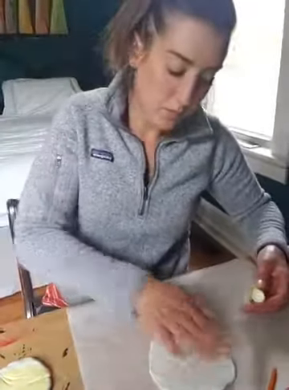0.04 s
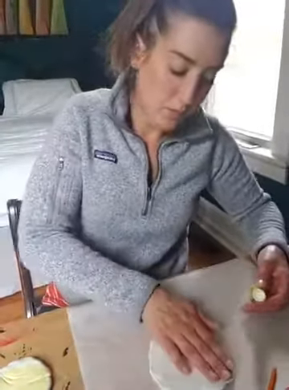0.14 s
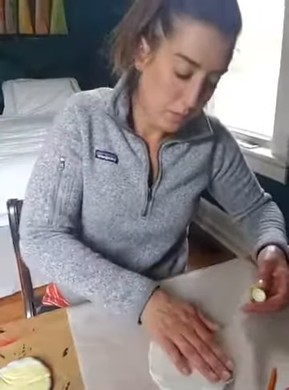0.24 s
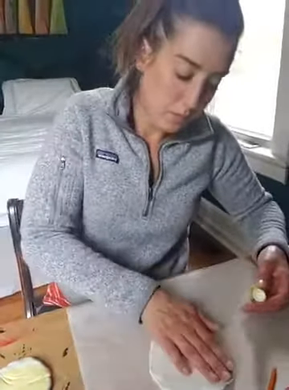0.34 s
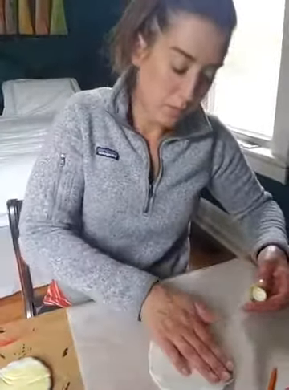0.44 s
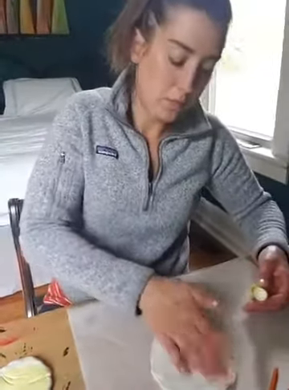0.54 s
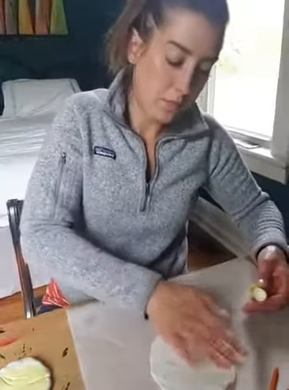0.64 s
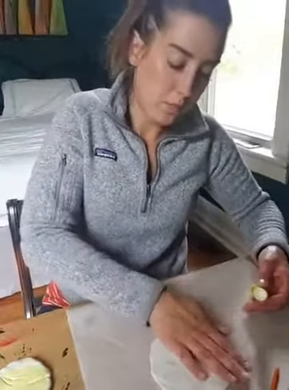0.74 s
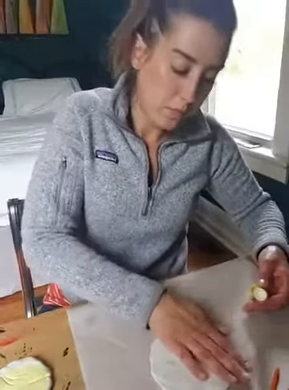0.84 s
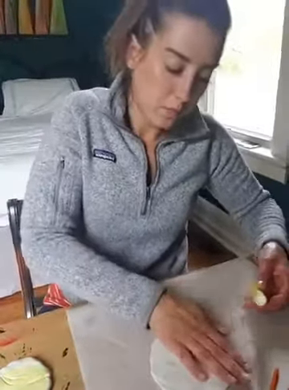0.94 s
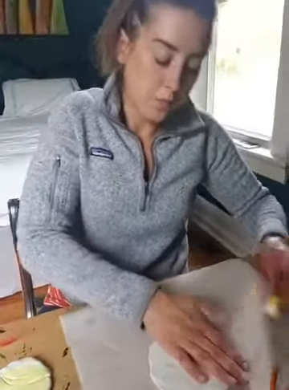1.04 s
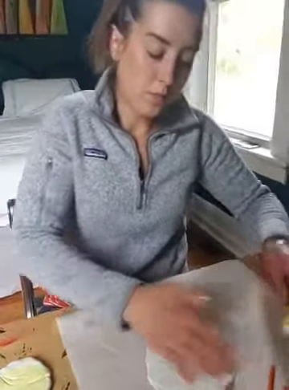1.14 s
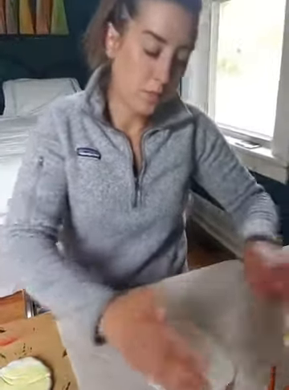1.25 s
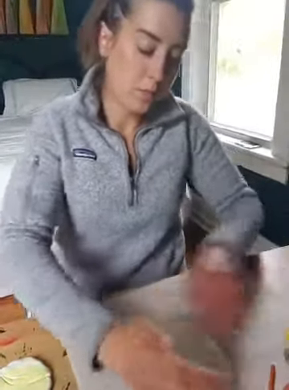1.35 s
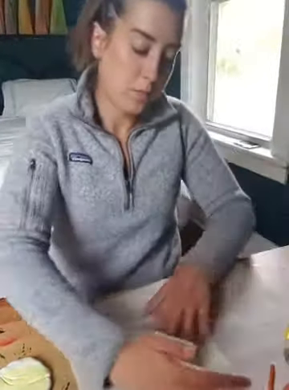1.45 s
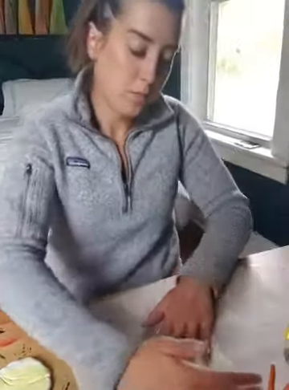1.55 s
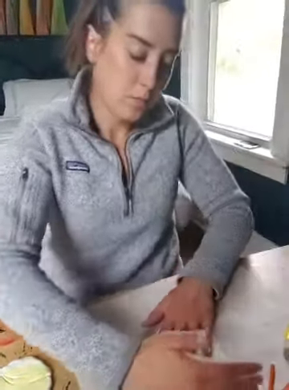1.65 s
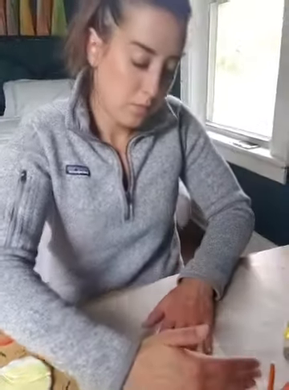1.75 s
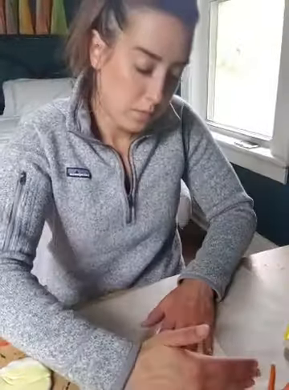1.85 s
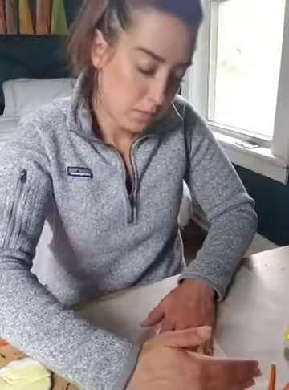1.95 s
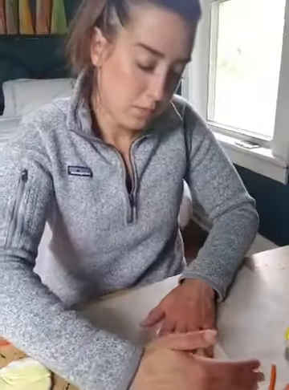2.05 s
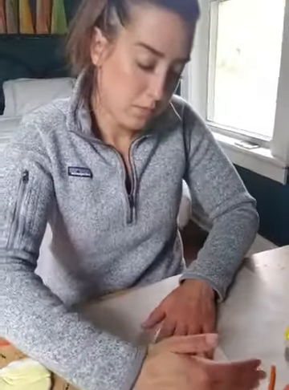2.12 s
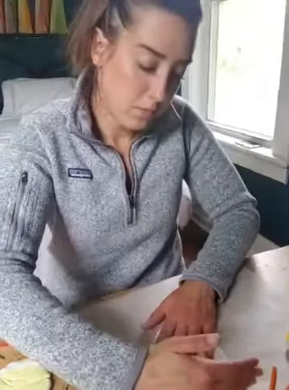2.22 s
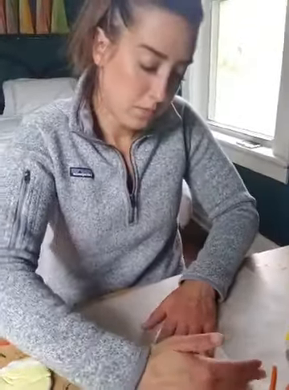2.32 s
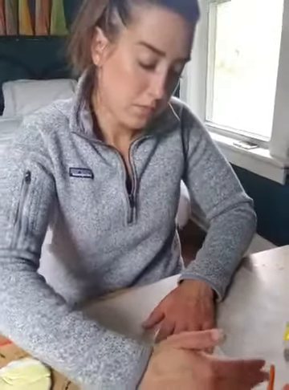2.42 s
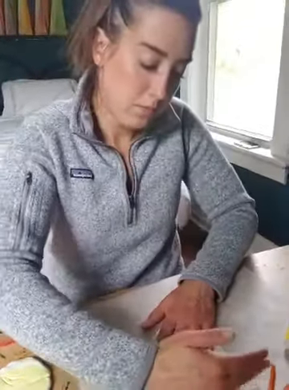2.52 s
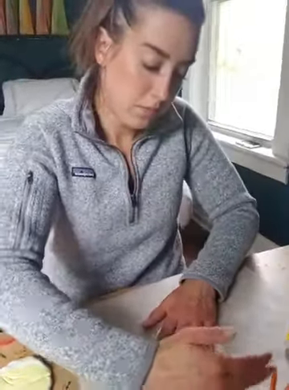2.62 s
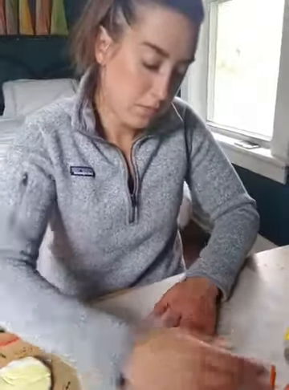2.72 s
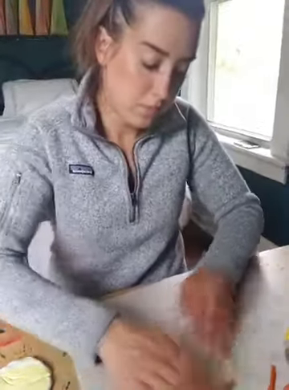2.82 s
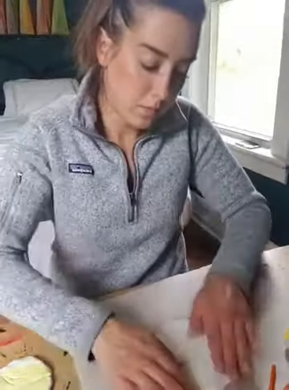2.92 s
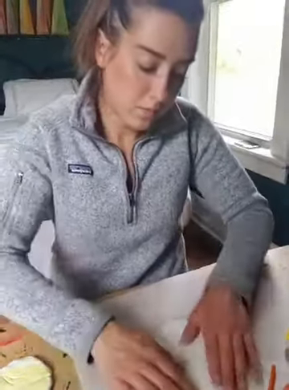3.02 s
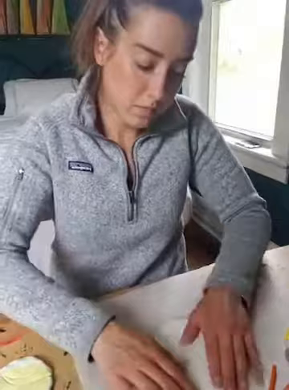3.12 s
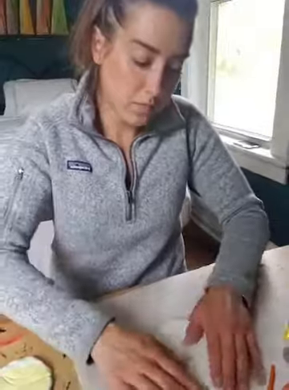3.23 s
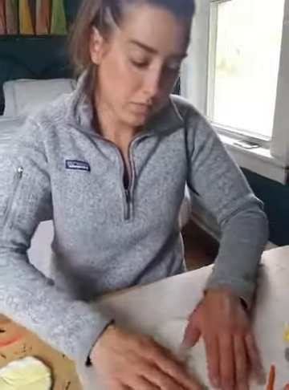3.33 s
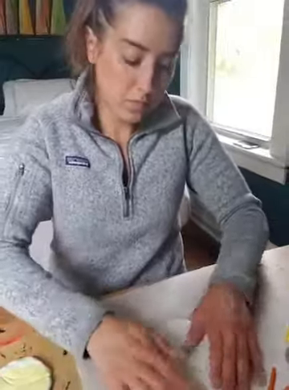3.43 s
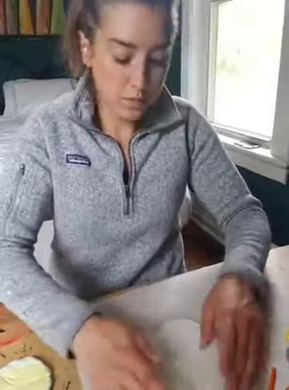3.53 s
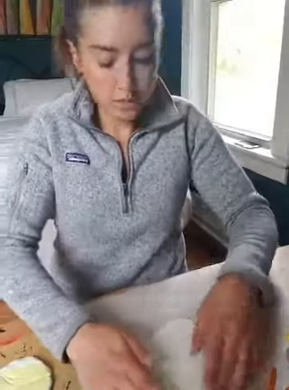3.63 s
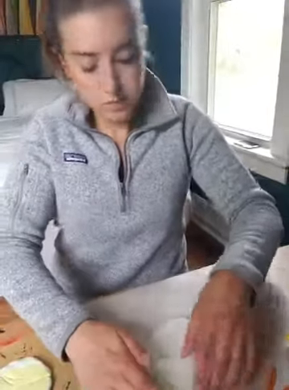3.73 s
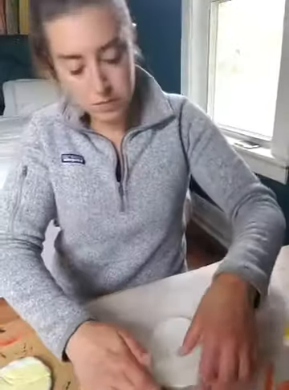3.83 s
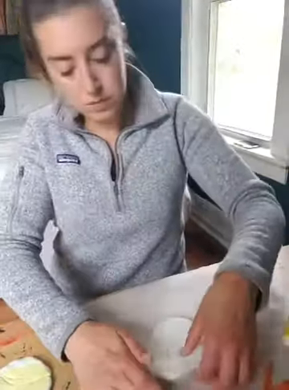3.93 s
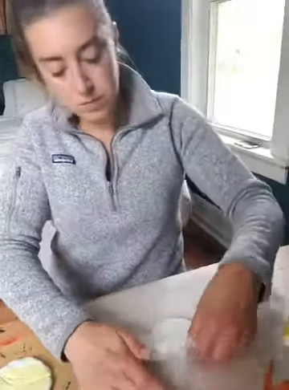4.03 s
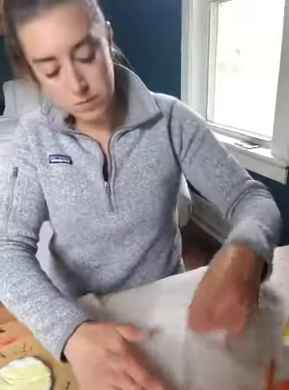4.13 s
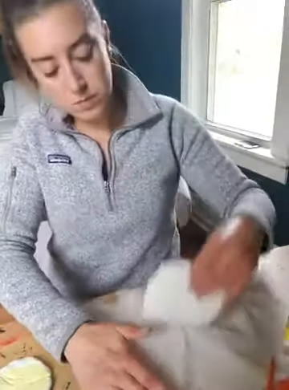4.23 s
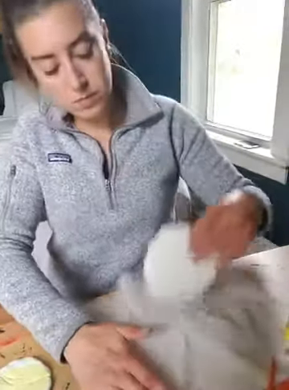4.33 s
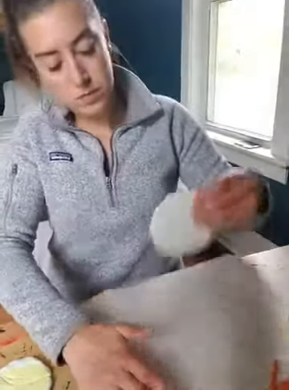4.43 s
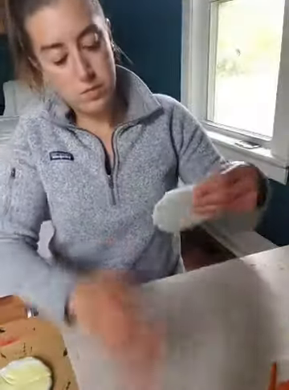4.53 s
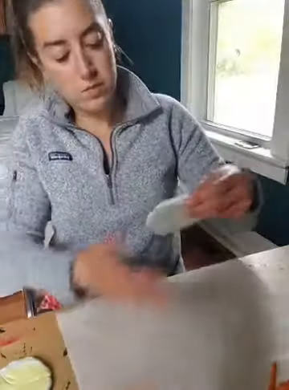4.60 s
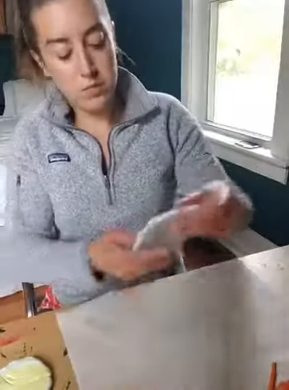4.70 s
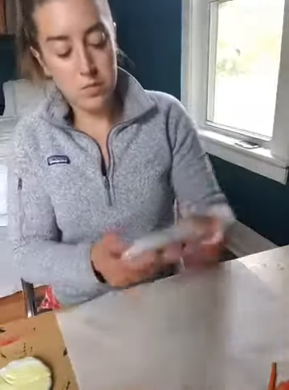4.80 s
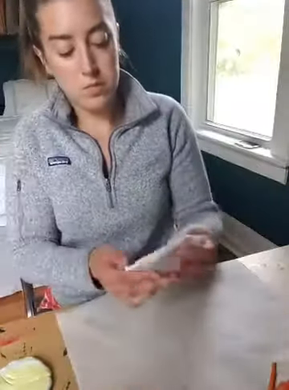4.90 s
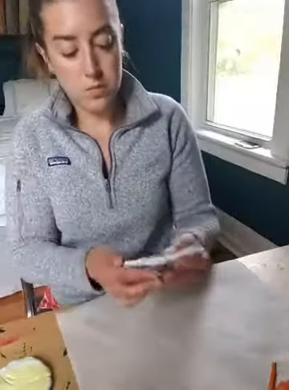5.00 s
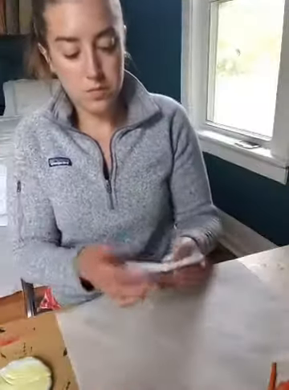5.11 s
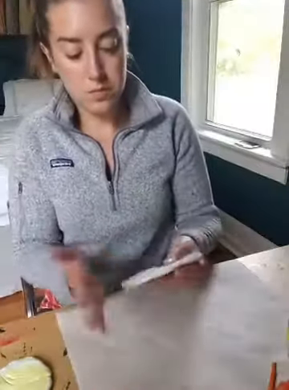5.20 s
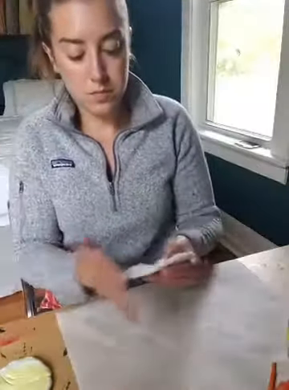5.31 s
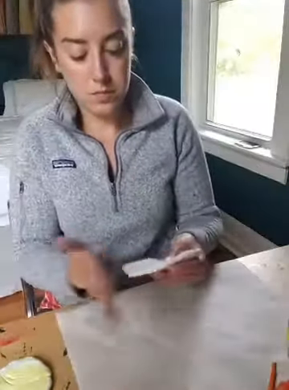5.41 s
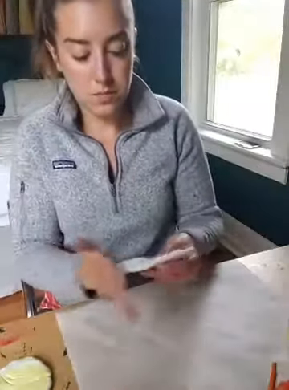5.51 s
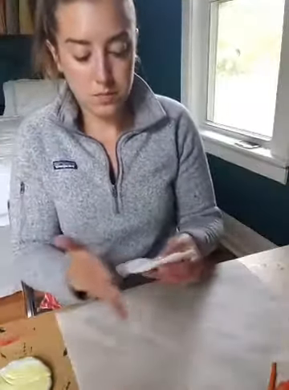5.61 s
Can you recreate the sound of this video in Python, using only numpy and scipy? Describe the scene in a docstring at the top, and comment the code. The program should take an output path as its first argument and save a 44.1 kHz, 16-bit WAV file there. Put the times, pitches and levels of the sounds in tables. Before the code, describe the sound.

Hands flatten clay on parchment paper on a wooden table, with soft dull thuds, light pats and short papery swishes. About a second in, a small tool lands with a rocking knock. More pats and brushing follow. Then the clay is peeled off, and the paper buckles, flaps and snaps in a crackle that grows loud and stops. A low electrical hum lies underneath in the small room.

```python
"""Clay on parchment paper

Hands flatten a slab of clay on a wooden table in a small room, over a low mains hum.
Palms thud, pat and brush the sheet, and a small tool lands with a rocking knock.
Then the clay is peeled off: the paper buckles, flaps and snaps in a loud crackle."""
import sys
import numpy as np
from scipy import signal
from scipy.fft import rfft, irfft
from scipy.io import wavfile

SR = 44100
rng = np.random.default_rng(int(sys.argv[2]) if len(sys.argv) > 2 else 0)


def pcm_store(signal):
    """Save signal as 16-bit PCM."""
    levels = np.round(np.clip(np.atleast_2d(signal), -1, 1) * 32767)
    wavfile.write(sys.argv[1], SR, levels.astype(np.int16).T)


N = 249603
TIME = np.arange(N) / SR


def from_db(db):
    """Decibels to gain."""
    return 10 ** (np.asarray(db) / 20)


def unit_rms(x):
    """Scale to unit power."""
    return x / np.sqrt(np.mean(x ** 2) + 1e-20)


def in_time(rows, outside=None):
    """Each column of a curve at every sample."""
    times_s, *columns = np.transpose(rows)
    return [np.interp(TIME, times_s, column, outside, outside) for column in columns]


def at_hz(points, hz):
    """Read a spectrum on a log-frequency axis."""
    points_hz, values = np.transpose(points)
    return np.interp(np.log(np.maximum(hz, 1)), np.log(points_hz), values)


def add(out, start_s, sound):
    """Mix a short sound in at start_s."""
    i = max(int(round(start_s * SR)), 0)
    out[i:i + len(sound)] += sound[:N - i]


def drift(rate_hz, hop=40, warmup=2000):
    """Smooth random wander of unit spread."""
    pole = np.exp(-2 * np.pi * rate_hz * hop / SR)
    noise = rng.standard_normal(N // hop + warmup + 2)
    slow = signal.lfilter([1], [1, -2 * pole, pole * pole], noise)[warmup:]
    return np.interp(np.arange(N) / hop, np.arange(len(slow)), unit_rms(slow))


def colour(x, spectrum, size=8192):
    """Minimum-phase filter with the given spectrum; white noise keeps its power."""
    hz = np.maximum(np.arange(size // 2 + 1) * SR / size, 1)
    skirts = np.minimum(hz / spectrum[0][0], 1) ** 2 * np.minimum(spectrum[-1][0] / hz, 1) ** 2
    cepstrum = irfft(np.log(from_db(at_hz(spectrum, hz)) * skirts + 1e-6))
    cepstrum[1:size // 2] *= 2
    cepstrum[size // 2 + 1:] = 0
    response = irfft(np.exp(rfft(cepstrum)))
    return signal.fftconvolve(x, response / np.linalg.norm(response))[:N]


def resonate(x, hz, width_hz):
    """A broad resonance; white noise keeps its power."""
    r, w = np.exp(-np.pi * width_hz / SR), 2 * np.pi * hz / SR
    gain = np.sqrt((1 - r * r) / 2)
    return signal.lfilter([gain, 0, -gain], [1, -2 * r * np.cos(w), r * r], x)


def ring(blows, modes):
    """Blows (start, force pulse) ring decaying modes, meeting each with a random sign."""
    out = np.zeros(N)
    signs = rng.choice([-1, 1], (len(blows), len(modes)))
    for k, (hz, level_db, t60_s) in enumerate(modes):
        force = np.zeros(N)
        for (start_s, push), sign in zip(blows, signs[:, k]):
            add(force, start_s, sign * push)
        r, w = from_db(-60 / (t60_s * SR)), 2 * np.pi * hz / SR
        mode = signal.lfilter([0, np.sin(w)], [1, -2 * r * np.cos(w), r * r], force + 1e-18)
        out += from_db(level_db) * mode
    return out


def burst(decay_s, size=2048):
    """A fast-decaying puff of noise."""
    return rng.uniform(-1.2, 1, size) * np.exp(-TIME[:size] / decay_s)


def grains(per_s, spread_db, decay_s):
    """Random micro-snaps, each a very short noise burst; unit power overall."""
    sizes = from_db(spread_db * rng.uniform(-0.84, 1, N))
    onsets = rng.random(N) < per_s / SR
    energy = signal.lfilter([1], [1, -np.exp(-2 / (decay_s * SR))], onsets * sizes ** 2 + 1e-18)
    return unit_rms(np.sqrt(energy) * rng.standard_normal(N))


def decays(events, decay_s):
    """An envelope that jumps at each event and dies away."""
    out = np.zeros(N)
    for start_s, level_db, *_ in events:
        add(out, start_s, from_db(level_db) * np.exp(-TIME[:SR // 2] / decay_s))
    return out


# Each row: time in seconds, hum in dB, rumble in dB, hiss in dB.
BACKGROUND_LEVELS = [(0, -55.5, -59, -75.5), (1.4, -57, -70, -72.5), (1.9, -60, -62, -73),
                     (4.1, -62, -61, -72.5), (4.5, -67.5, -68.5, -75.5), (5.66, -71, -69, -79.5)]
# Each row: frequency in Hz, relative density in dB.
RUMBLE_SPECTRUM = [(25, -6.5), (42, 6), (72, -6), (110, -0.5), (170, -6), (270, -12), (380, -21.5),
                   (1000, -28.5), (1600, -36.5), (3000, -40)]
MIC_HISS_SPECTRUM = [(1000, -10.5), (2000, -10), (3200, -6.5), (5000, -7.5), (6400, -5.5), (7400, 3.5),
                     (8000, -0.5), (8600, -19), (10200, -14.5), (12600, -4.5), (14500, -5.5)]

def background(hum_hz=119.5, fundamental_db=-11, wander_rad=0.34):
    """Mains hum with its weaker fundamental, room rumble and microphone hiss; all sink near the end."""
    hum_db, rumble_db, hiss_db = in_time(BACKGROUND_LEVELS)
    phase = 2 * np.pi * hum_hz * TIME + wander_rad * drift(rate_hz=2.8)
    hum = np.sqrt(2) * from_db(hum_db) * (np.sin(phase) + from_db(fundamental_db) * np.sin(phase / 2))
    rumble = from_db(rumble_db) * colour(rng.standard_normal(N), RUMBLE_SPECTRUM)
    hiss = from_db(hiss_db) * colour(rng.standard_normal(N), MIC_HISS_SPECTRUM)
    return hum + rumble + hiss


# Each row: frequency in Hz, T60 in seconds.
ROOM_DECAY = [(100, .55), (260, .46), (700, .4), (1840, .36), (4850, .38), (12800, .36)]
# Each row: frequency in Hz, reverberation in dB re the direct sound.
ROOM_LEVELS = [(60, -11), (250, -1), (1000, -5.5), (3000, -3.5), (12000, -9.5)]

def room(x, first_echo_s=0.0042):
    """Diffuse reflections follow the direct sound and die away band by band."""
    t = TIME[:SR * 3 // 4]
    onset = np.clip(t / first_echo_s - 1, 0, 1)
    edges_hz = np.geomspace(40, 18000, 10)
    tail = np.zeros(len(t))
    for low, high in zip(edges_hz, edges_hz[1:]):
        hz = np.sqrt(low * high)
        fade = from_db(-60 * t / at_hz(ROOM_DECAY, hz))
        bandpass = signal.butter(2, [low, high], "band", fs=SR, output="sos")
        band = onset * fade * signal.sosfilt(bandpass, rng.standard_normal(len(t)))
        gain = from_db(at_hz(ROOM_LEVELS, hz)) * np.sqrt(2 * (high - low) / SR)
        tail += gain * band / np.linalg.norm(band)
    return x + signal.fftconvolve(x, tail)[:N]


# Each row: start in seconds, level in dB.
FINGER_PATS = [(0.393, -57), (0.676, -59.5), (2.031, -48), (2.690, -39)]
# Each row: frequency in Hz, relative density in dB.
PAT_SPECTRUM = [(120, -5.5), (270, 8), (480, 3.5), (750, 3.5), (1150, 2), (1900, -5), (2600, -13),
                (5000, -19.5)]

def finger_pats():
    """Flat fingers press the air out from under the sheet in a short hollow slap."""
    return colour(decays(FINGER_PATS, decay_s=0.0099) * rng.standard_normal(N), PAT_SPECTRUM)


# Each row: peak time in seconds, length in seconds, hiss in dB before trim, rub in dB, resonance in Hz.
BRUSH_STROKES = [(0.062, 0.064, -67.5, -68.5, 5040), (0.428, 0.08, -58, -56.5, 6840),
                 (0.865, 0.11, -64, -67.5, 12600), (0.963, 0.034, -46.5, -81, 4250),
                 (0.996, 0.063, -42.5, -50.5, 2930), (1.463, 0.087, -52, -60.5, 2110),
                 (1.545, 0.092, -53.5, -70, 12380), (1.995, 0.12, -62, -65, 5200),
                 (2.282, 0.14, -64.5, -73.5, 1542), (2.652, 0.043, -36, -48, 2850),
                 (2.864, 0.025, -56.5, -85, 2920), (2.937, 0.062, -59.5, -64.5, 6500),
                 (3.09, 0.082, -65.5, -80, 7200), (3.2, 0.062, -48.5, -61.5, 4820),
                 (3.379, 0.041, -40.5, -57, 3020), (3.413, 0.17, -56, -79.5, 12400),
                 (5.112, 0.044, -70.5, -83.5, 5060)]
# Each row: frequency in Hz, relative density in dB.
FIBRE_SPECTRUM = [(700, -13.5), (1500, -9), (2400, -9), (2800, -2.5), (4500, -3.5), (7500, -2),
                  (9500, -8.5), (12700, -0.5), (15000, -3.5)]
RUB_SPECTRUM = [(90, -9.5), (260, 18), (480, 2.5), (750, 4.5), (1150, 4), (1500, -7.5), (2500, -20),
                (5000, -20.5)]

def brushing(hiss_trim_db=-2.5, resonance_db=-11, rise_share=0.37, roundness=1.3):
    """Skin and sleeve catch on the fibres: grainy hiss, resonance of the free paper, hollow rub."""
    fibres = grains(per_s=1500, spread_db=3.5, decay_s=0.0008)
    hiss, rub, paper = np.zeros((3, N))
    for peak_s, length_s, hiss_db, rub_db, hz in BRUSH_STROKES:
        from_peak = np.maximum((peak_s - TIME) / rise_share, (TIME - peak_s) / (1 - rise_share))
        speed = np.exp(-np.minimum(from_peak / length_s, 10) ** roundness)
        hiss += from_db(hiss_db + hiss_trim_db) * speed
        rub += from_db(rub_db) * speed
        paper += from_db(hiss_db + resonance_db) * speed ** 2 * resonate(fibres, hz, hz / 4)
    catches = grains(per_s=670, spread_db=0, decay_s=0.0028)
    return colour(hiss * fibres, FIBRE_SPECTRUM) + paper + colour(rub * catches, RUB_SPECTRUM)


# Each row: start in seconds, impulse in dB, contact time in ms.
PALM_BLOWS = [(0.045, -33.5, 7), (0.672, -31, 4.26), (0.961, -40.5, 1.9), (1.134, -29.5, 1.05),
              (1.489, -34, 6.6), (2.082, -46.5, 5.6), (2.455, -48.5, 3.35), (2.546, -55, 2.1),
              (2.685, -33, 5.2), (2.725, -45, 9.1), (2.925, -38.5, 3.94), (3.016, -45.5, 7),
              (3.162, -42, 3.4), (3.216, -31.5, 5.8), (3.543, -43, 4.9), (3.657, -43.5, 2.45),
              (4.160, -38, 6.8)]
# Each row: frequency in Hz, gain in dB, T60 in seconds.
TABLETOP_MODES = [(41.8, -17, 0.32), (55.6, -14.5, 0.83), (75.95, -9, 0.3), (97, -4.5, 0.092),
                  (125.2, -7, .3), (155, -12, 0.14), (191.8, -10, 0.26), (264.5, -4, 0.13),
                  (308.7, -9, 0.24), (347, -10, 0.37), (423, -14, 0.18)]

def palm_thuds():
    """A soft push of hand and clay rings the tabletop; the longer the contact, the duller."""
    blows = []
    for start_s, level_db, contact_ms in PALM_BLOWS:
        push = np.sin(np.pi * np.minimum(TIME[:1024] * 1000 / contact_ms, 1)) ** 2
        blows.append((start_s, from_db(level_db) * push / push.sum()))
    return ring(blows, TABLETOP_MODES)


# Each row: start in seconds, impulse in dB, relative crack in dB before trim.
TOOL_CONTACTS = [(1.1331, -11, 0.5), (1.1365, -13, 5), (1.142, -20, -1.5), (1.1675, -13, -16),
                 (1.184, -22.5, -2), (1.213, -17, -16), (1.292, -33, -5.5)]
# Each row: frequency in Hz, gain in dB, T60 in seconds.
TOOL_ON_TABLE_MODES = [(197, -17.5, 0.048), (269.3, -12.5, 0.07), (360, -16.5, 0.041), (584, -17.5, 0.037),
                       (680, -12, 0.042), (816, -17, 0.035), (978, -15, 0.083), (1267, -7.5, .022),
                       (1537, -15, 0.023), (2056, -9, 0.017), (2470, -13.5, 0.013), (3532, -23.5, .012),
                       (5640, -18, 0.016)]
# Each row: frequency in Hz, relative density in dB.
CRACK_SPECTRUM = [(200, 2), (700, 4.5), (2200, -1.5), (3200, -7.5), (6000, -13.5), (8500, -12),
                  (11000, -19), (15000, -15)]

def tool_knocks(soft_hz=550, lowest_hz=160, crack_trim_db=-9):
    """The tool lands and rocks with cracks and a woody ring; contacts with less crack ring duller."""
    blows, crack = [], np.zeros(N)
    for start_s, level_db, crack_db in TOOL_CONTACTS:
        corner_hz = soft_hz * (1 + from_db(crack_db + 20))
        push = np.exp(-2 * np.pi * corner_hz * TIME[:128])
        blows.append((start_s, from_db(level_db) * push / push.sum()))
        add(crack, start_s, from_db(level_db + crack_db + crack_trim_db) * burst(decay_s=0.0067))
    # A small contact radiates no deep bass.
    highpass = signal.butter(2, lowest_hz, "high", fs=SR, output="sos")
    wood = signal.sosfilt(highpass, ring(blows, TOOL_ON_TABLE_MODES))
    return wood + colour(crack, CRACK_SPECTRUM)


# Each row: time in seconds, pull as a relative sound level in dB.
PEEL_PULL = [(3.545, -54.5), (3.665, -54.5), (3.715, -44.5), (3.96, -46.5), (4.105, -29.5), (4.16, -30),
             (4.204, -25.5), (4.28, -27), (4.33, -45)]

def sheet_pull_db():
    """How hard the sheet is pulled off the clay."""
    return in_time(PEEL_PULL, outside=-120)[0]


# Each row: start in seconds, relative level in dB, facet ring in Hz.
LOUD_CREASES = [(0.951, -41, 4370), (1.001, -30, 2570), (2.2557, -40.5, 7800), (2.6465, -25, 7160),
                (2.6563, -22.5, 4500), (2.9474, -42, 7300), (3.181, -36, 4570), (3.5501, -30, 14100),
                (3.6645, -29, 3520), (3.6997, -13.5, 7030), (3.7671, -22, 3860), (3.8199, -24, 3034),
                (3.8685, -15, 12300), (3.923, -23, 2150), (3.9387, -22.5, 5590), (3.9933, -24, 2884),
                (4.0323, -21.5, 5400), (4.0724, -20.5, 6170), (4.1099, -9, 1839), (4.1866, -13.5, 4694),
                (4.1975, -7, 11300), (4.2385, -12, 13010), (4.248, -9.5, 8030), (4.2725, -9.5, 4690)]
# Each row: frequency in Hz, relative density in dB.
SNAP_SPECTRUM = [(400, -12), (1200, -18.5), (2200, -1.5), (4500, -0.5), (7200, 1.5), (9300, -0.5),
                 (11500, 2.5), (15000, 3)]

def crease_snaps(tick_db=-5, ring_db=-8, lesser_db=-16, decay_s=0.0032):
    """Creases flip with bright ticks pitched by facet size; lesser, random ones follow the pull."""
    out = from_db(sheet_pull_db() + lesser_db) * grains(per_s=44, spread_db=2, decay_s=decay_s)
    for start_s, level_db, hz in LOUD_CREASES:
        tick = from_db(level_db + tick_db) * burst(decay_s)
        facet = resonate(tick, hz, hz / 4)
        add(out, start_s, tick + from_db(ring_db) * facet)
    return colour(out, SNAP_SPECTRUM)


# Each row: frequency in Hz, relative density in dB.
FLAP_SPECTRUM = [(65, -45.5), (110, -10), (236, -6), (271, -2.5), (376, -10), (628, -6), (777, -3.5),
                 (1020, -0.5), (1180, -3), (1850, -11), (2200, -15), (2860, -40), (4840, -120)]

def loose_sheet(level_db=-40.5, at_pull_db=-30, db_per_pull_db=1.066):
    """The loose part of the sheet flaps with the pull."""
    envelope = from_db(level_db + db_per_pull_db * (sheet_pull_db() - at_pull_db))
    return colour(envelope * grains(per_s=560, spread_db=7.5, decay_s=0.0027), FLAP_SPECTRUM)


# Each row: frequency in Hz, width in Hz, gain in dB.
TAUT_MODES = [(1975, 240, -1), (2750, 100, -3.5)]

def taut_sheet(buckling, slack_db=-17.5, taut_db=-10, tautest_s=3.921, width_s=0.12):
    """Buckles pluck the paper; its ring stands out most from the crackle while the sheet is taut."""
    tension = np.exp(-((TIME - tautest_s) / width_s) ** 2)
    strength = buckling * (from_db(slack_db) + from_db(taut_db) * tension)
    plucks = strength * grains(per_s=240, spread_db=8, decay_s=0.00031)
    return sum(from_db(db) * resonate(plucks, hz, width_hz) for hz, width_hz, db in TAUT_MODES)


# Each row: frequency in Hz, relative density in dB.
CRACKLE_SPECTRUM = [(900, -11.5), (1500, -14), (2300, -10.5), (2800, -3), (3500, -3.5), (4800, 0),
                    (6000, -3), (7500, -1), (9200, -7.5), (11000, -2), (13000, -3.5), (14500, -1.5)]

def peeling(crackle_db=-3.5, settle_db=-25, settle_s=0.017):
    """The sheet leaves the clay in a swarm of small buckles and crackles on after each loud snap."""
    buckling = from_db(sheet_pull_db()) + from_db(settle_db) * decays(LOUD_CREASES, settle_s)
    crackle = from_db(crackle_db) * buckling * grains(per_s=1000, spread_db=1.5, decay_s=0.0054)
    return colour(crackle, CRACKLE_SPECTRUM) + loose_sheet() + taut_sheet(buckling)


def scene():
    """Everything on the table sounds into the room, over the background; mono."""
    direct = palm_thuds() + tool_knocks() + finger_pats() + brushing() + peeling() + crease_snaps()
    return (room(direct) + background())[None]


def record(dry, low_hz=34, high_hz=14270):
    """The small microphone loses the deepest bass; a steep low-pass cuts the top."""
    thin = signal.sosfilt(signal.butter(4, low_hz, "high", fs=SR, output="sos"), dry)
    return signal.sosfilt(signal.ellip(14, .2, 70, high_hz, fs=SR, output="sos"), thin)


dry = scene()
out = record(dry)
pcm_store(out)
```